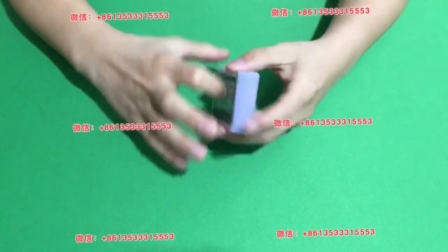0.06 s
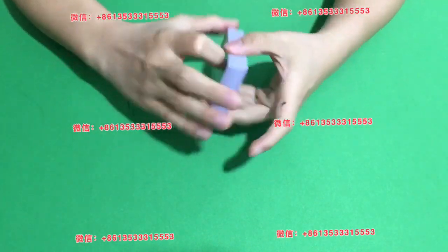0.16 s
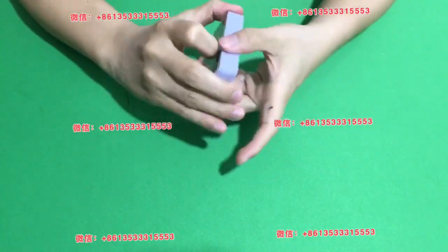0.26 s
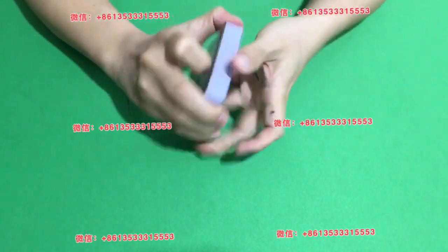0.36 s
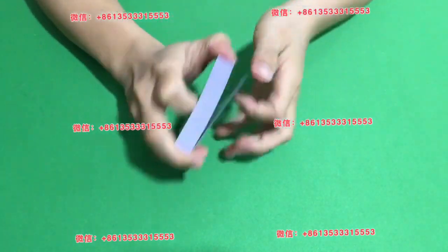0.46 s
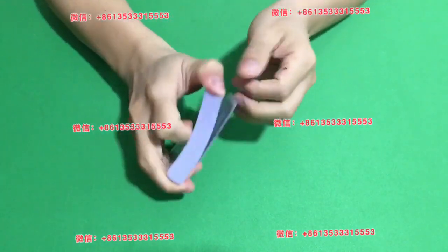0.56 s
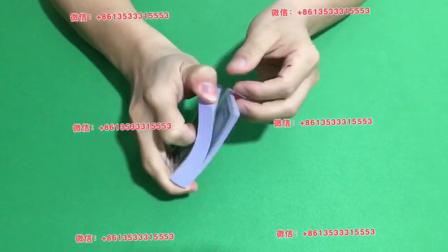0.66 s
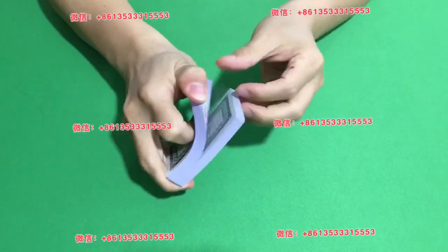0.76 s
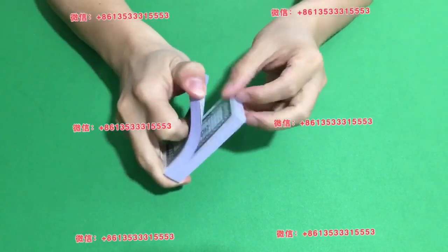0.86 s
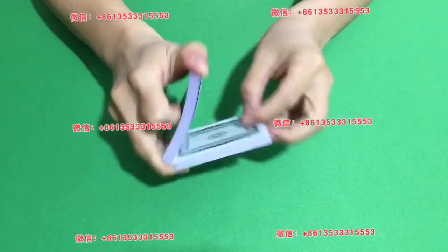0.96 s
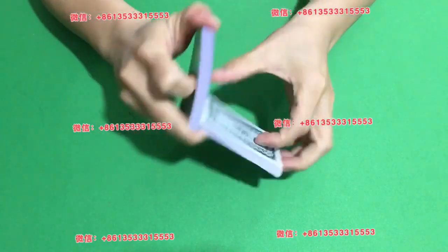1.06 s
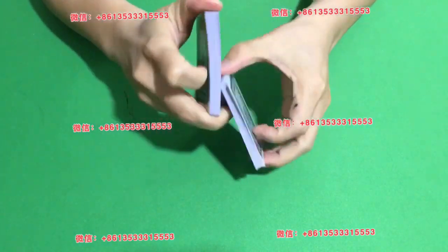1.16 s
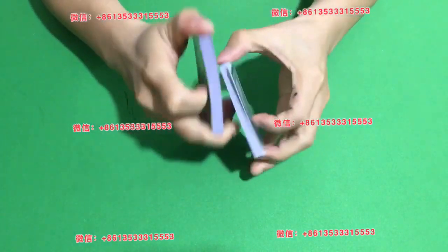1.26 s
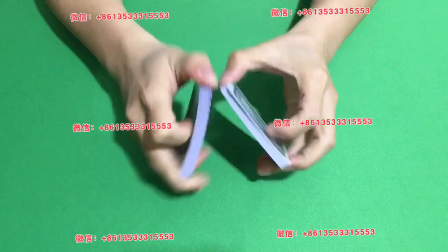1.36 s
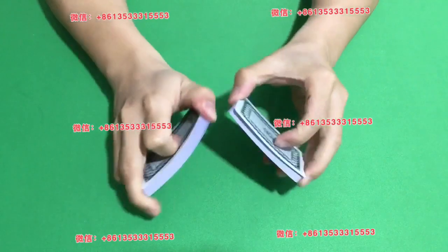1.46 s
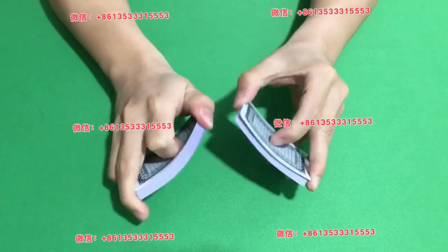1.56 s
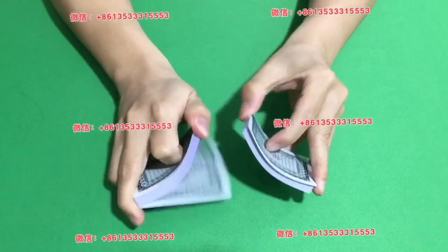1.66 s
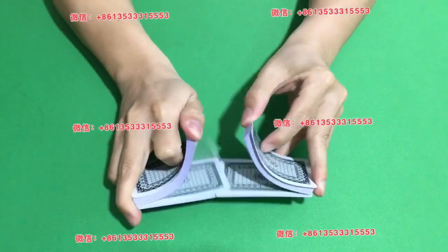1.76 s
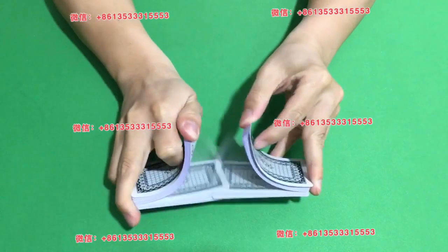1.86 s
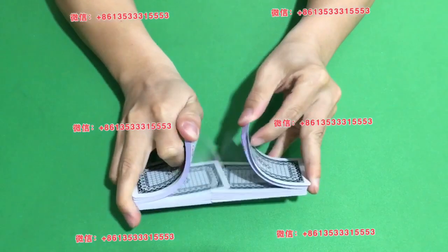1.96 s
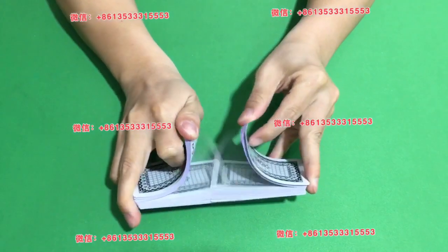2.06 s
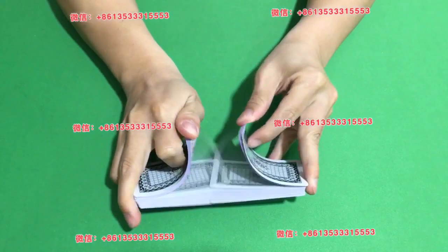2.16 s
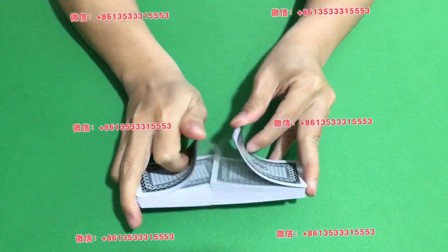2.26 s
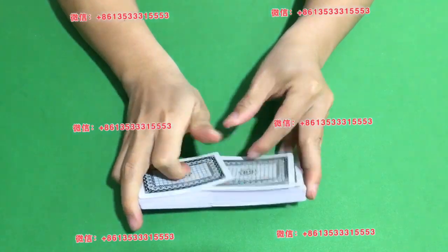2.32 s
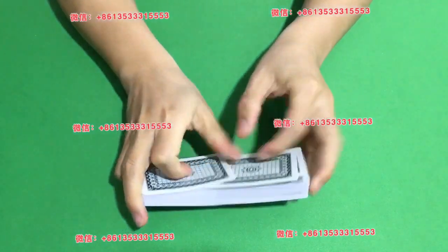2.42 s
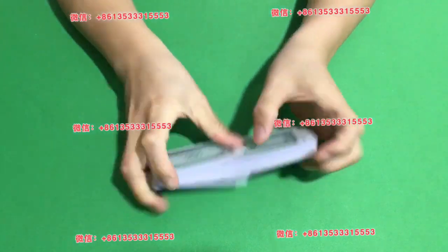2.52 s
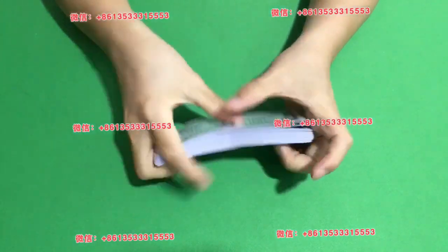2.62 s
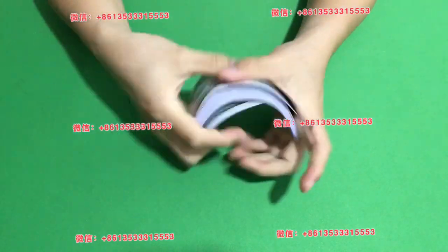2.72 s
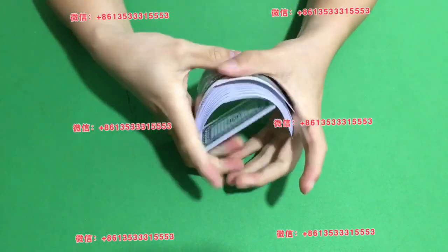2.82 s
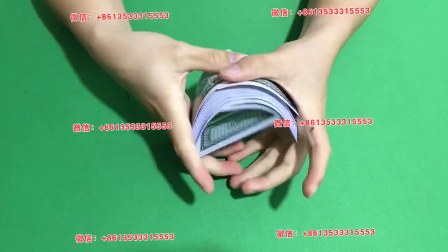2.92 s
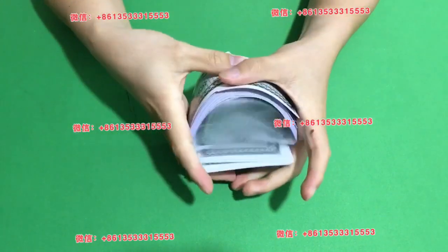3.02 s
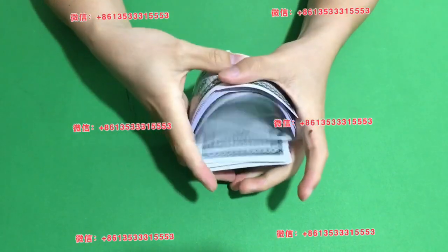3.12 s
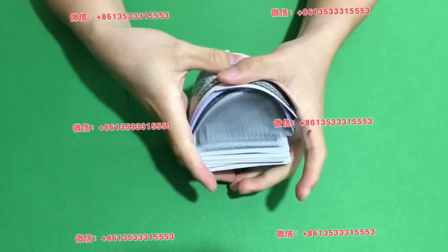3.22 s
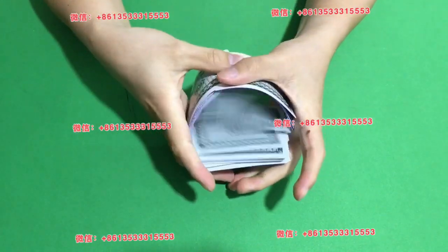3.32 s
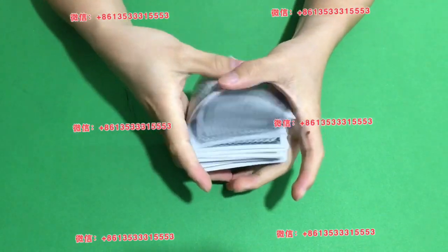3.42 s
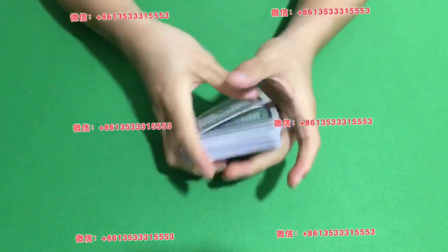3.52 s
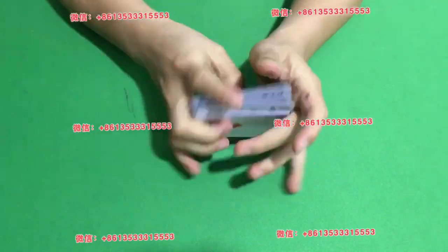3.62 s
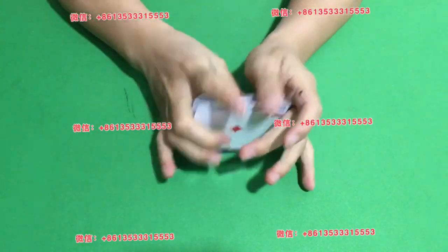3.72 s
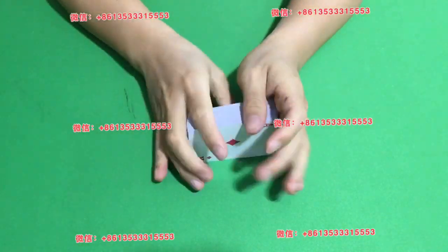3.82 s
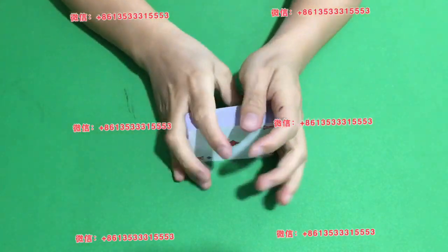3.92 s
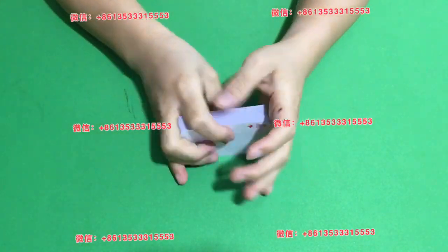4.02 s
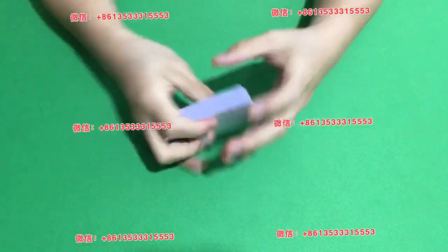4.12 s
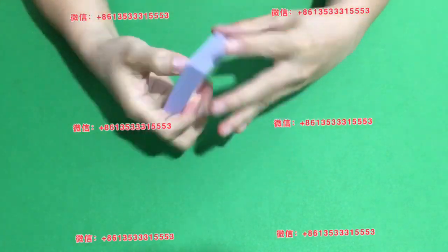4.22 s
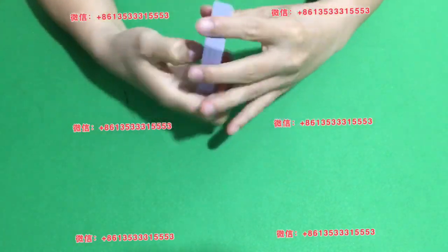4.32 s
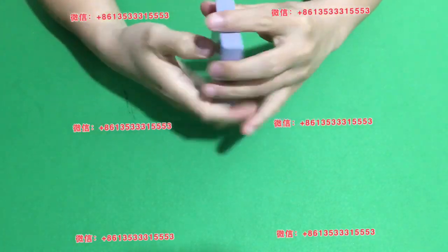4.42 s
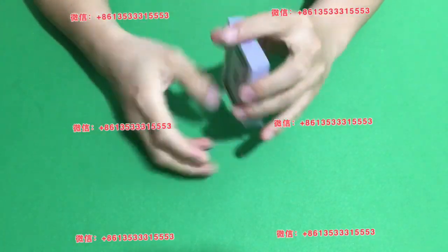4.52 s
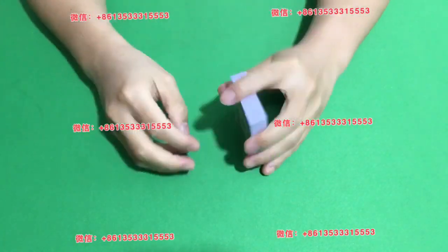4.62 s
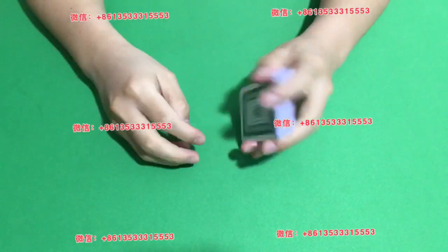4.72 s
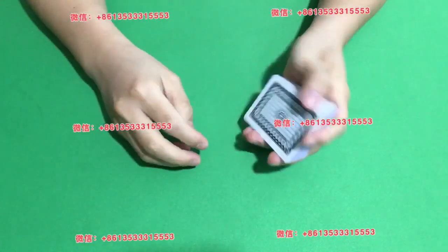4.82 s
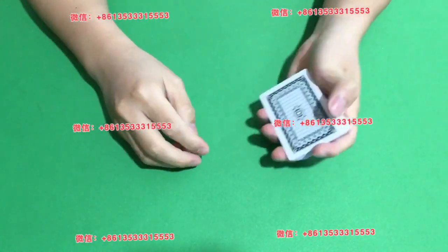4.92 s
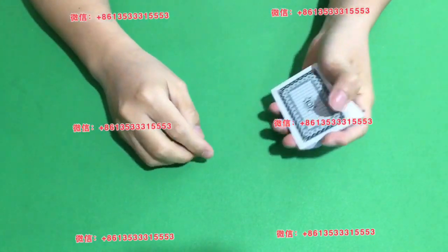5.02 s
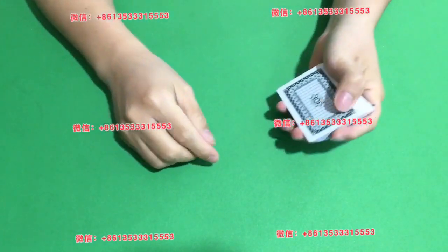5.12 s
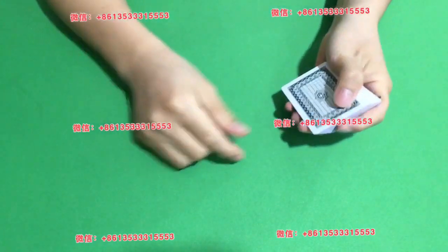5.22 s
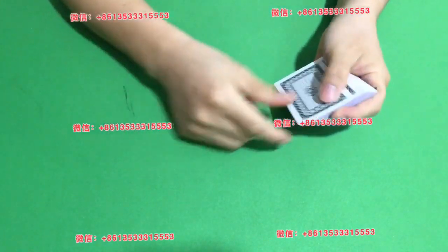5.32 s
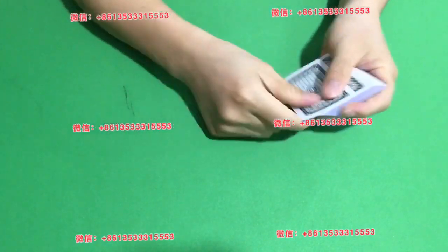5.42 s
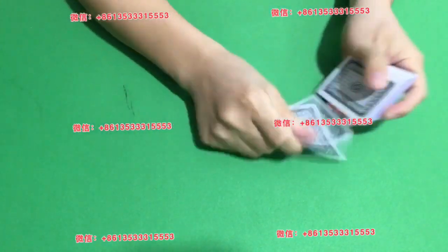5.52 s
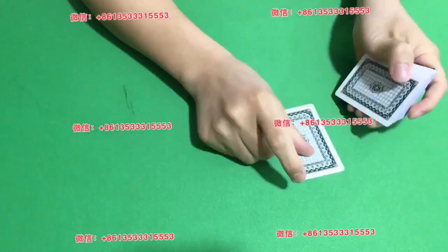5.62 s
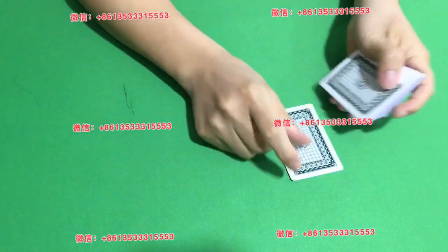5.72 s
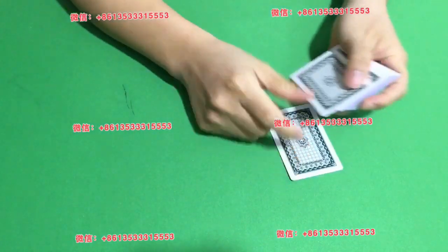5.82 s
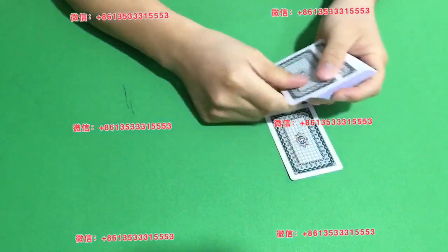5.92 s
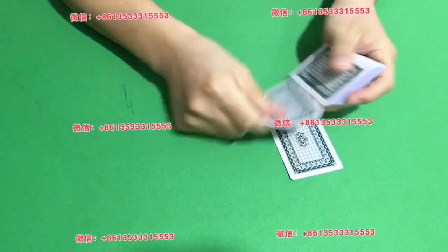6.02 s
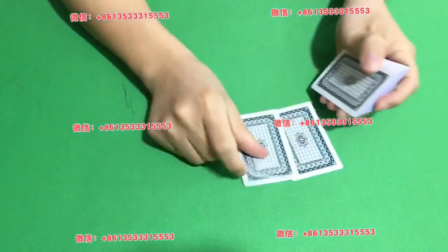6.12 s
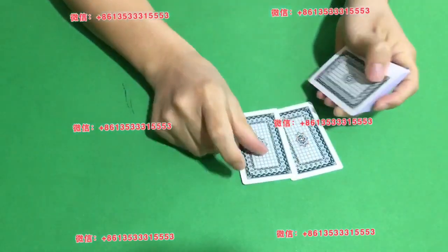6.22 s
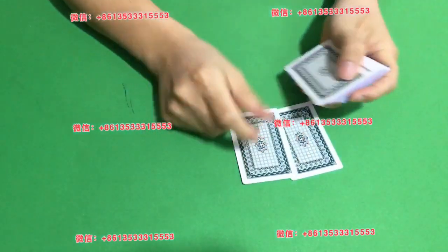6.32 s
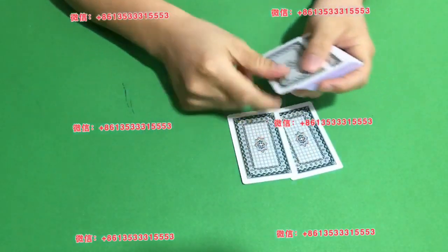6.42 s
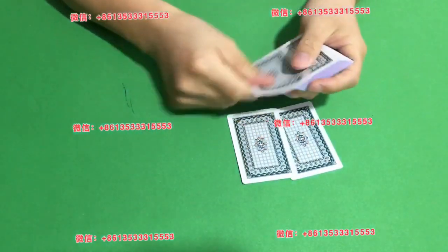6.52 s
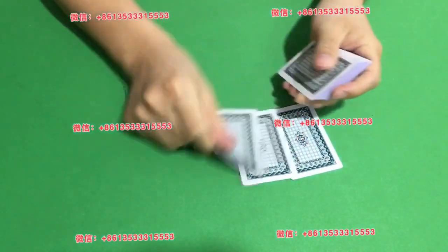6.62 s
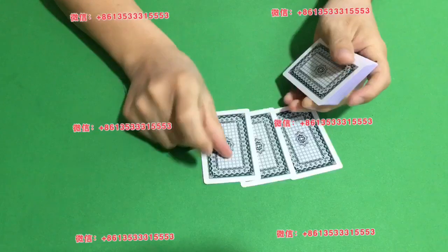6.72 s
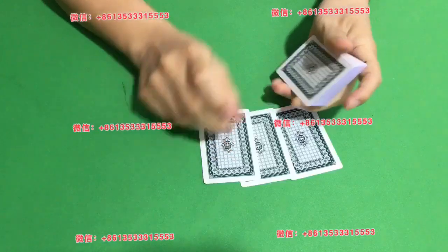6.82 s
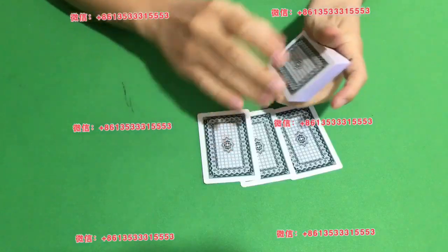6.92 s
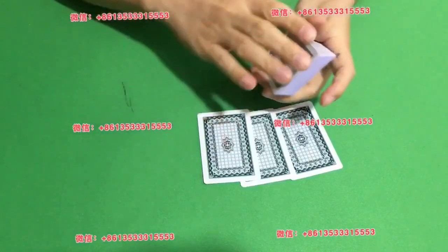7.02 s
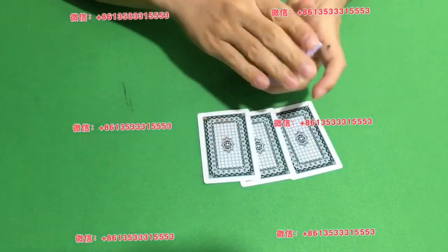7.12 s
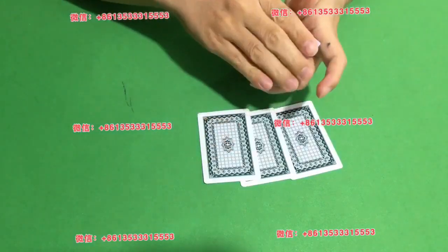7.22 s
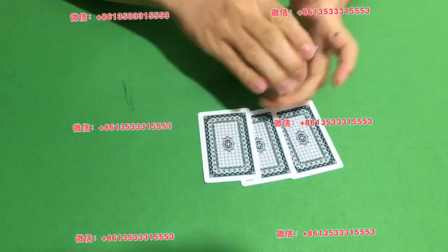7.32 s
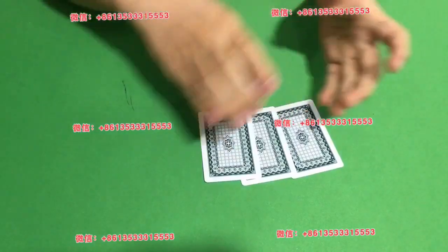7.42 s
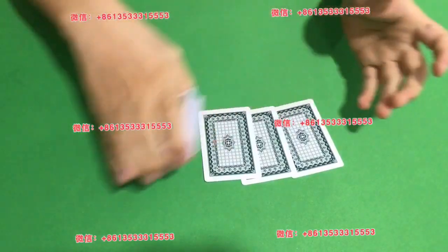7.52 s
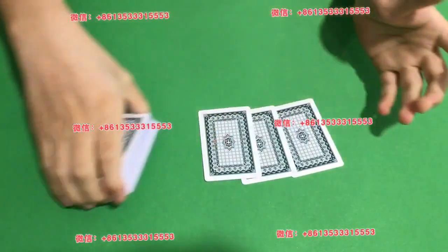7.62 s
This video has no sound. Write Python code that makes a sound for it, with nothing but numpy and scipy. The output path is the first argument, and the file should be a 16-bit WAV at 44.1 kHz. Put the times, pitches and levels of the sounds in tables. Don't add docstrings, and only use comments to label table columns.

```python
import sys
import numpy as np
from scipy import signal
from scipy.fft import rfft, irfft
from scipy.io import wavfile
from scipy.ndimage import uniform_filter1d

SR = 44100
rng = np.random.default_rng(int(sys.argv[2]) if len(sys.argv) > 2 else 0)


def waveform_to_disk(signal):
    frames = np.transpose(np.atleast_2d(signal))
    scaled = np.clip(frames, -1, 1) * 32767
    samples = np.round(scaled).astype(np.int16)
    wavfile.write(sys.argv[1], SR, samples)


def ratio(d):
    e = np.asarray(d, float) / 20
    return 10 ** e


N = 338247
TIME = np.arange(N) / SR

# f/Hz, level/dB (per Hz)
RUMBLE_SPECTRUM = [(34, -40), (58, -6), (70, -3), (103, -4.5), (140, 1.5), (184, -7), (216, -7.5),
                   (247, -26), (300, -9.5), (390, -45), (660, -120)]
# f/Hz, level/dB (per Hz)
TRAFFIC_SPECTRUM = [(140, -13.5), (230, -1), (552, -11.5), (949, -12), (1150, -16.5), (1360, -16),
                    (1690, -20.5), (1850, -21.5), (2840, -29), (3530, -30), (5000, -55), (6500, -44.5),
                    (11000, -120)]
# f/Hz, level/dB (per Hz)
HISS_SPECTRUM = [(2350, -23.5), (4000, -3.5), (4890, -5), (6350, -7), (9330, -8.5), (10400, -14.5),
                 (11300, -10), (14600, -13.5), (15300, -24), (15700, -65)]
# t/s, level/dB
STREET_LEVEL = [(0, -54), (.4, -54.5), (.62, -52), (1.4, -51), (2.5, -51.5), (3.9, -48.5), (4.3, -50.5),
                (5.1, -49.5), (5.7, -50.5), (6.3, -49), (6.9, -51), (7.68, -50.5)]
# t/s, level/dB
ENGINE_LEVEL = [(0, -65), (.4, -50), (1.1, -54.5), (2.15, -43.5), (2.55, -49), (3.3, -59), (3.9, -56),
                (4.4, -48), (5.7, -50.5), (6.3, -53.5), (6.95, -47), (7.3, -55), (7.68, -45)]
# first t/s, last t/s, peak level/dB
HAMMER_RUNS = [
    (.44, .544, -64),
    (0.7325, 1.44, -58.5),
    (2.55, 2.69, -58),
    (3.428, 3.428, -59.5),
    (3.83, 4.413, -61),
    (4.702, 5.17, -63),
    (5.32, 5.738, -65),
    (6.149, 6.271, -69),
    (6.684, 6.826, -64),
    (6.954, 7.634, -59),
]
# f/Hz, level/dB, time to fall 60 dB t/s
STEEL_MODES = [(983, -16, 0.052), (1360, 2.5, 0.12), (1820, -12, 0.15), (2300, -14.5, 0.14),
               (3484, -5.5, 0.046)]
# f/Hz, level/dB, time to fall 60 dB t/s
TABLE_MODES = [(78.6, -2, 0.19), (88.6, -11, 1.0), (132.5, -13, 0.8), (150, 0, 0.012), (230, 2, .006),
               (160.5, -5, 0.19), (197, -12.5, 0.158), (286, -11.5, 0.2), (430, -11, 0.051),
               (616, -12.5, 0.083), (788, -18, .04), (1130, -12, 0.023)]
# f/Hz, level/dB (per Hz)
BOOM_SPECTRUM = [(55, -24), (90, -3.5), (160, 4), (220, -0.5), (320, -17.5), (580, -17), (900, -30),
                 (1600, -36), (2300, -46)]
# t/s, level/dB
BLOWS = [
    (3.685, -36.5),
    (3.724, -40.5),
    (3.84, -46),
    (4.558, -15.5),
    (6.498, -38.5),
    (6.56, -42.5),
    (7.43, -44),
]
# t/s, level/dB
LIFT = (4.5553, -23)
# start t/s, end t/s, pressure level/dB, edge hiss over it level/dB, pile over it level/dB
STROKES = [(.455, .465, -70, -1, -5), (.55, .62, -70, -8, 15), (.62, .72, -69, -9, 19),
           (1.6, 1.64, -63.5, -17, 6), (1.67, 1.8, -55.5, -11, 5.5), (1.8, 2.1, -58.5, -3, 8),
           (2.1, 2.27, -54.5, -4, 6), (2.27, 2.32, -60.5, -6, -2), (2.33, 2.46, -64, -9.5, 4),
           (2.475, 2.495, -70, 0.5, 6), (2.62, 2.63, -69, -3, 2), (2.66, 2.73, -66, -2, -10),
           (2.84, 2.86, -66, -10, -10), (2.87, 2.915, -61, 6.5, -15), (2.92, 3.0, -52.5, 1, 3.5),
           (3.0, 3.3, -56, 1.5, 2), (3.33, 3.385, -54.5, 0, 2.5), (3.4, 3.47, -66, -4, -8),
           (3.565, 3.6, -66.5, -12, 6.5), (3.66, 3.68, -59.5, -22, 15), (3.685, 3.71, -46, -27, 8),
           (3.72, 3.8, -64, -25, 10), (3.93, 4.0, -65, -10, 7), (4.56, 4.6, -66, -28, 14),
           (4.6, 4.75, -72, -28, 12)]
# start t/s, end t/s, pressure level/dB
PUSHES = [
    (5.396, 5.434, -68),
    (5.913, 5.924, -63.5),
    (6.457, 6.46, -62.5),
]
# f/Hz, level/dB (per Hz)
EDGE_SPECTRUM = [(1760, -3.5), (3000, -5.5), (3310, -4.5), (5010, -9.5), (5990, -8), (10400, -15),
                 (14200, -19), (15800, -25), (16500, -44)]
# f/Hz, level/dB (per Hz)
BODY_SPECTRUM = [(600, -17), (900, -9), (1200, -1.5), (2000, -3.5), (2600, -9), (3400, -12), (4500, -28)]
# f/Hz, level/dB (per Hz)
PILE_SPECTRUM = [(150, -30), (260, 3), (400, -9), (700, -9), (1100, -13), (1500, -37)]
# f/Hz, width f/Hz, level/dB
CARD_MODES = [(820, 57, -20), (1500, 860, -2.5), (2300, 1700, -18), (3320, 290, -16)]
# t/s, level/dB
TWANGS = [
    (5.436, -44),
    (5.944, -33.5),
    (5.961, -39),
    (6.001, -59),
    (6.03, -55),
    (6.062, -57),
    (6.15, -64),
]
# t/s, slap level/dB
THUMBING = [(0.539, -54), (0.5506, -52), (0.5585, -57), (0.566, -49), (0.576, -57), (0.58, -54),
            (0.5851, -54), (0.589, -51), (0.5943, -50), (0.6045, -52), (0.6141, -54), (0.6192, -57),
            (0.6249, -51), (0.632, -52), (0.6374, -49), (0.6438, -52), (0.65, -57), (0.653, -58),
            (0.6594, -51), (0.67, -50), (0.6757, -48), (0.6831, -46), (0.6914, -44), (0.6978, -48),
            (0.704, -52), (0.7104, -51)]
# t/s, slap level/dB, edge tick level/dB, slap pitch f/Hz
RIFFLE = [(1.6548, -37, -55, 820), (1.6605, -37, -42.5, 1920), (1.6848, -40, -49, 2480),
          (1.7186, -34, -41, 1800), (1.7263, -39, -36, 2140), (1.7543, -34.5, -37, 2250),
          (1.7785, -39, -39.5, 2220), (1.8101, -32, -37.5, 2200), (1.837, -36, -34, 1490),
          (1.846, -39, -37, 2050), (1.8705, -39, -39, 2200), (1.8868, -36, -60, 1200),
          (1.896, -33, -34, 2190), (1.9138, -62, -37, 2110), (1.9219, -44, -37, 1440),
          (1.952, -36, -36.5, 2300), (1.9766, -38, -61, 1250), (1.9969, -36, -33, 1560),
          (2.0229, -42, -40, 1470), (2.0378, -37, -33, 3040), (2.045, -58, -38, 1770),
          (2.0852, -33, -37, 2270), (2.1014, -40, -39, 1490), (2.128, -51, -41, 950),
          (2.1338, -37, -43, 3540), (2.1462, -40, -37, 4240), (2.193, -50, -41, 860),
          (2.2321, -42, -38.5, 2170), (2.242, -30.5, -33, 2900), (2.2528, -33, -39, 1450)]
# t/s, slap level/dB, edge tick level/dB, slap pitch f/Hz
RIFFLE_FAINT = [(1.6675, -39, -48, 1680), (1.6724, -43, -50, 730), (1.6765, -42, -55, 990),
                (1.6901, -47, -53, 1510), (1.6951, -41, -59, 1030), (1.7061, -38, -56, 730),
                (1.7357, -49, -57, 1590), (1.7406, -47, -59, 990), (1.7447, -49, -55, 1420),
                (1.7509, -48, -56, 1380), (1.7674, -48, -57, 1420), (1.7741, -46, -45, 2240),
                (1.7939, -46, -61, 900), (1.7988, -41, -55, 1550), (1.8038, -38, -62, 860),
                (1.8266, -44, -53, 1250), (1.8567, -43, -51, 950), (1.8664, -42, -43, 1940),
                (1.8768, -44, -52, 900), (1.9037, -41, -51, 820), (1.9401, -41, -48, 1160),
                (1.9646, -44, -52, 1590), (1.9691, -53, -49, 3100), (1.9873, -51, -63, 900),
                (2.0049, -45, -42, 900), (2.0136, -50, -52, 900), (2.0283, -44, -57, 1720),
                (2.0567, -51, -49, 3320), (2.0602, -51, -51, 2970), (2.0675, -48, -53, 900),
                (2.0744, -46, -59, 1680), (2.0922, -49, -57, 1080), (2.1092, -41, -39, 900),
                (2.1138, -44, -53, 1160), (2.1224, -45, -45, 1420), (2.1531, -39, -38.5, 1080),
                (2.1581, -42, -46, 860), (2.1696, -43, -53, 1340), (2.1763, -44, -49, 3570),
                (2.1851, -37.5, -50, 1890), (2.2065, -44, -41, 1120), (2.2108, -43, -35.5, 3620),
                (2.2257, -51, -46, 730), (2.2653, -43, -50, 2070), (2.2722, -47, -60, 1200)]
# t/s, slap level/dB, edge tick level/dB, slap pitch f/Hz
BRIDGE = [(2.9154, -34.5, -47, 1540), (2.9323, -28.5, -31.5, 3060), (2.95, -29.5, -30.5, 3300),
          (2.955, -28, -34, 1010), (2.969, -36, -43, 2650), (2.9785, -27.5, -41, 3250),
          (2.986, -30.5, -41, 3120), (2.994, -28.5, -31, 3200), (3.0691, -34.5, -41, 1250),
          (3.092, -34, -34.5, 820), (3.1128, -33.5, -39, 3400), (3.1193, -29.5, -33, 3520),
          (3.1616, -40, -48, 1410), (3.2133, -35, -45, 3230), (3.235, -40, -45, 3400),
          (3.249, -34.5, -54, 2980), (3.283, -33.5, -44, 2940), (3.3131, -30, -38, 3600),
          (3.37, -39, -56, 1082), (3.385, -40.5, -58, 820)]
# t/s, slap level/dB, edge tick level/dB, slap pitch f/Hz
BRIDGE_FAINT = [(2.9085, -57, -46, 3660), (2.9123, -57, -46, 3230), (2.9266, -41, -39, 2630),
                (2.9419, -43, -47, 1250), (2.9596, -37, -46, 1420), (3.0056, -42, -47, 2670),
                (3.02, -46, -49, 1290), (3.029, -40, -51, 3360), (3.04, -39, -49, 1850),
                (3.044, -45, -55, 1340), (3.058, -39, -47, 2970), (3.0741, -36, -39, 3010),
                (3.0843, -42, -50, 1940), (3.129, -46, -43, 3190), (3.1325, -47, -42, 4130),
                (3.138, -43, -47, 3450), (3.1464, -48, -46, 3230), (3.154, -49, -52, 3230),
                (3.171, -50, -53, 3010), (3.18, -47, -47, 1940), (3.1841, -47, -49, 3010),
                (3.1908, -40, -46, 3170), (3.1984, -45, -44, 2890), (3.205, -40, -47, 2760),
                (3.2197, -40, -40, 2970), (3.229, -50, -46, 3190), (3.2534, -49, -49, 2540),
                (3.2655, -43, -46, 2890), (3.2931, -52, -52, 3060), (3.304, -50, -51, 2580),
                (3.3086, -46, -46, 3570), (3.3209, -42, -48, 1250), (3.3245, -48, -48, 3100),
                (3.331, -47, -49, 2520), (3.339, -49, -44, 2410), (3.3485, -51, -42, 2840),
                (3.3615, -43, -46, 3230), (3.3657, -48, -48, 1940), (3.3814, -46, -52, 1380),
                (3.3886, -45, -51, 2200)]
# t/s, slap level/dB, edge tick level/dB, slap pitch f/Hz
HANDLING = [(0.397, -47.5, -51.5, 2830), (0.48, -51, -54, 3020), (0.497, -53, -70, 2000),
            (0.509, -53, -64, 2200), (0.5624, -45, -53, 1110), (0.728, -48, -61, 820),
            (1.5748, -40.5, -76, 1110), (1.588, -43, -67, 990), (1.6026, -39, -55.5, 1010),
            (1.6155, -40, -59, 1360), (1.6355, -38.5, -58, 1370), (2.669, -48, -62, 2300),
            (3.5614, -40.5, -53, 3500), (3.6946, -32, -59, 1717), (3.739, -31.5, -70, 1410),
            (4.5521, -40, -63.5, 1200), (4.555, -32, -55, 1160), (5.322, -51, -60, 1060),
            (6.349, -56, -63, 1180), (6.4886, -54, -52, 3250), (7.39, -48, -61, 1500)]
# t/s, slap level/dB, edge tick level/dB, slap pitch f/Hz
SQUARING = [(3.6363, -66, -70, 1250), (3.6397, -54.5, -67, 1340), (3.6446, -56, -69, 1590),
            (3.6518, -51.5, -69, 1810), (3.6584, -46, -71, 1770), (3.6624, -49, -70, 1030),
            (3.6665, -39, -66, 1680), (3.6708, -32.5, -60, 1770), (3.6782, -39, -65, 1680),
            (3.6841, -35, -61, 1590), (3.6896, -28.5, -68, 1770), (3.6987, -27, -65, 1770),
            (3.7069, -34.5, -73, 1640), (3.7135, -35, -68, 1480), (3.7183, -47, -71, 1380),
            (3.7264, -43, -74, 1160)]
# t/s, slap level/dB, edge tick level/dB, slap pitch f/Hz
CATCHES = [(5.4165, -50, -66, 2300), (5.4247, -45, -64, 2300), (5.4302, -45, -50, 2900),
           (5.4361, -32, -62, 1300), (5.4386, -36, -62, 2200), (5.453, -42, -66, 2200),
           (5.938, -46, -50, 3000), (5.9471, -34.5, -60, 1820), (6.476, -50, -62, 1700),
           (6.4855, -52, -57, 2000), (6.4995, -35, -69, 1900), (6.51, -44, -65, 1900)]
# snap t/s, snap level/dB, snap pitch f/Hz, landing t/s, landing level/dB
DEALS = [
    (5.4347, -27, 3200, 5.4922, -31),
    (5.9437, -29.5, 2300, 6.0352, -35.5),
    (6.4959, -31.5, 1120, 6.5893, -33.5),
]

REBOUND_S = 0.018


def rms_one(x):
    return x / np.sqrt(np.mean(x ** 2) + 1e-20)


def peak_one(x):
    return x / np.abs(x).max()


def over_time(table):
    return np.interp(TIME, *np.transpose(table))


def colour(x, spectrum):
    hz, level_db = np.transpose(spectrum)
    grid = np.maximum(np.fft.rfftfreq(8192, 1 / SR), 1)
    curve_db = np.interp(np.log(grid), np.log(hz), level_db, left=-70, right=-70)
    cepstrum = irfft(np.log(ratio(curve_db)))
    cepstrum[1:4096] *= 2
    cepstrum[4097:] = 0
    response = rms_one(irfft(np.exp(rfft(cepstrum)))) / np.sqrt(8192)
    return signal.fftconvolve(x, response)[:len(x)]


def drift(rate):
    r = np.exp(-80 * np.pi * rate / SR)
    slow = signal.lfilter([1], [1, -2 * r, r * r], rng.standard_normal(N // 40 + 2002))[2000:]
    return np.interp(np.arange(N) / 40, np.arange(len(slow)), rms_one(slow))


def ring(x, hz, t60):
    r, w = ratio(-60 / (t60 * SR)), 2 * np.pi * hz / SR
    return signal.lfilter([0, np.sin(w)], [1, -2 * r * np.cos(w), r * r], x + 1e-18)


def burst(noise, rise_s, fall_s):
    t = np.arange(len(noise)) / SR
    return noise * (1 - np.exp(-t / rise_s)) * np.exp(-t / fall_s)


def coloured_noise(spectrum):
    return rms_one(colour(rng.standard_normal(N), spectrum))


def microphone_hiss():
    return ratio(-79) * coloured_noise(HISS_SPECTRUM)


def street():
    busy_db = over_time(STREET_LEVEL)
    rumble = ratio(busy_db + 0.56 * drift(9)) * coloured_noise(RUMBLE_SPECTRUM)
    traffic_db = -58.5 + 0.54 * (busy_db - busy_db.mean()) + 0.83 * drift(8.7)
    return rumble + ratio(traffic_db) * coloured_noise(TRAFFIC_SPECTRUM)


def engine():
    hum_hz = 48.3 + 1.53 * drift(3.6)
    level_db = over_time(ENGINE_LEVEL) - 2.0 + 2.2 * drift(5.9)
    return ratio(level_db) * np.sin(2 * np.pi * np.cumsum(hum_hz) / SR)


def hammer():
    gap_s, spread_db = 0.142, 1
    blows = np.zeros(N + 4096)
    for first, last, level_db in HAMMER_RUNS:
        for s in np.linspace(first, last, round((last - first) / gap_s) + 1):
            at = round(s * SR)
            puff = burst(rng.standard_normal(4096), 0.0099, 0.034)
            blows[at:at + 4096] += ratio(level_db + spread_db * rng.standard_normal()) * puff
    rings = sum(ratio(level_db - 27.5) * ring(blows, hz, t60) for hz, level_db, t60 in STEEL_MODES)
    return (rings + ratio(9) * colour(blows, TRAFFIC_SPECTRUM))[:N]


def room(x):
    t60_s, wall_cut_hz = 0.72, 1900
    out, dull = np.zeros(N), np.exp(-2 * np.pi * wall_cut_hz / SR)
    lags = (rng.uniform(.015, .045, 10) * SR).astype(int)
    for k, lag in enumerate(lags):
        loop, gain, state = x.copy(), ratio(-60 * lag / SR / t60_s), [0.]
        for i in range(lag, N, lag):
            back, state = signal.lfilter([gain * (1 - dull)], [1, -dull], loop[i - lag:i], zi=state)
            loop[i:i + lag] += back[:N - i]
        out += (loop - x) * (-1) ** k
    return out


def knock():
    blows = np.zeros(N)
    for s, level_db in BLOWS:
        blows[round(s * SR)] = -ratio(level_db)
    swell = signal.fftconvolve(-blows, burst(np.ones(SR), 0.0073, 0.14))[:N]
    boom = swell * coloured_noise(BOOM_SPECTRUM)
    blows[round(LIFT[0] * SR)] = ratio(LIFT[1])
    contact = np.hanning(round(0.0012 * SR))
    blows = np.convolve(blows, contact / contact.sum())[:N]
    top = sum(ratio(level_db) * ring(blows, hz, t60) for hz, level_db, t60 in TABLE_MODES)
    return signal.sosfilt(signal.butter(3, 58, "high", fs=SR, output="sos"), top) + ratio(-13.5) * boom


def stroke_gains():
    rise_db_per_s, fall_db_per_s = 801, 603
    rows = STROKES + [(start, end, level_db, 6, -8) for start, end, level_db in PUSHES]
    for s, _, _, land_s, _ in DEALS:
        rows += [(s - 0.0066, s + 0.013, -52, -19, -5),
                 (land_s, land_s + 0.075, -69, -10, 3),
                 (s, land_s + REBOUND_S, -64, -9, 3)]
    gains = np.zeros((3, N))
    for start, end, level_db, edge_db, pile_db in rows:
        near = slice(round((start - .1) * SR), round((end + .1) * SR))
        t = TIME[near]
        rise_db = rise_db_per_s * np.maximum(start - t, 0)
        fall_db = fall_db_per_s * np.maximum(t - end, 0)
        parts_db = level_db - rise_db - fall_db + np.array([[edge_db], [0], [pile_db]])
        gains[:, near] = np.maximum(gains[:, near], ratio(parts_db))
    return gains


def slides():
    catches = (rng.random(N) < 260 / SR) * 1.0
    slip = 0.65 + 0.35 * rms_one(signal.lfilter([1], [1, -.97], catches))
    edge_gain, face_gain, pile_gain = uniform_filter1d(stroke_gains(), size=300)
    edge, face, pile = rng.standard_normal((3, N)) * slip * ratio(2.34 * drift(53))
    many = (TIME > 1.55) & (TIME < 3.74)
    face = 0.32 * rms_one(catches * np.sign(face)) * many + ratio(-4) * face
    arched = (TIME > 2.62) & (TIME < 3.33)
    arch_hz, arch_width_hz = 3250, 1230
    air = ring(ring(face, arch_hz, 2.4 / arch_width_hz), arch_hz, 2.5 / arch_width_hz)
    arch = ratio(-2.5 + 5.2 * drift(15.8)) * arched * rms_one(air)
    rubbing = rms_one(colour(face, BODY_SPECTRUM)) * ratio(-3 * arched)
    return (edge_gain * rms_one(colour(edge, EDGE_SPECTRUM)) + face_gain * (rubbing + arch)
            + pile_gain * rms_one(colour(pile + 0.72 * face, PILE_SPECTRUM)))


def twangs():
    out = np.zeros(N + 1024)
    for s, level_db in TWANGS:
        at = round(s * SR)
        puff = burst(rng.standard_normal(1024), 0.00082, 0.0026)
        out[at:at + 1024] += ratio(level_db) * peak_one(ring(puff, 2380, 0.031))
    since = TIME - TWANGS[1][0]
    fade = (since > 0) * np.exp(-np.abs(since) / .13)
    out[:N] += ratio(-61) * fade * rms_one(ring(rng.standard_normal(N), 2370, 0.027))
    return out


def card_slap(noise, chance, hz, bright):
    puff = 0.75 * bright * burst(noise, 0.00046, 0.0018)
    puff[10] -= 3.5
    slap = 0
    for (f, width, level_db), c in zip([(hz, .28 * hz, 1)] + CARD_MODES, chance):
        slap = slap + ratio(level_db + 1.6 * c) * ring(puff, f, 2.2 / width) * np.sqrt(width)
    cut_hz = max(1.3 * hz, 1500 + 2900 * bright)
    return peak_one(signal.sosfilt(signal.butter(3, cut_hz, fs=SR, output="sos"), slap))


def all_snaps():
    rows = RIFFLE + BRIDGE + HANDLING + RIFFLE_FAINT + BRIDGE_FAINT + SQUARING + CATCHES
    for s, level_db in THUMBING:
        rows = rows + [(s, level_db, level_db - 13, 2200 + 5500 * (s - THUMBING[0][0]))]
    land_hz = 1650
    for s, level_db, hz, land_s, land_db in DEALS:
        rows = rows + [(s, level_db, level_db - 21, hz),
                       (land_s, land_db, land_db - 12.5, land_hz),
                       (land_s - .003, land_db - 21, land_db - 9.5, land_hz),
                       (land_s + REBOUND_S, land_db - 21, land_db - 26, 1250)]
    return rows


def snaps():
    edge, body = np.zeros(N + 1024), twangs()
    for s, slap_db, tick_db, hz in all_snaps():
        at = slice(round(s * SR), round(s * SR) + 1024)
        tick, rattle = rng.standard_normal((2, 1024))
        chance = rng.standard_normal(7)
        tick = rms_one(signal.lfilter([1, 2.0 * np.tanh(chance[4])], [1], tick))
        edge[at] += ratio(tick_db + 5) * burst(tick, 0.00047, 0.0011)
        bright = np.clip(2.0 + (tick_db - slap_db) / 32, .1, 1)
        body[at] += ratio(slap_db + 5.0) * card_slap(rattle, chance, hz, bright)
        push = ring(burst(rattle, 0.00014, 0.00094), 340 * 2 ** (0.24 * chance[5]), 0.035)
        body[at] += ratio(slap_db - 5.5 + chance[6]) * peak_one(push)
    body = signal.sosfilt(signal.butter(4, 4400, fs=SR, output="sos"), body)
    return (colour(edge, EDGE_SPECTRUM) + body)[:N]


def scene():
    background = microphone_hiss() + street() + engine() + hammer()
    cards = snaps() + slides()
    return (background + ratio(-20) * room(cards) + knock() + cards)[None]


def low_pass(x):
    return signal.sosfilt(signal.butter(12, 16630, fs=SR, output="sos"), x)


def record(dry):
    mix = signal.sosfilt(signal.butter(4, 38, "high", fs=SR, output="sos"), dry)
    return low_pass(mix)


dry = scene()
out = record(dry)
waveform_to_disk(out)
```